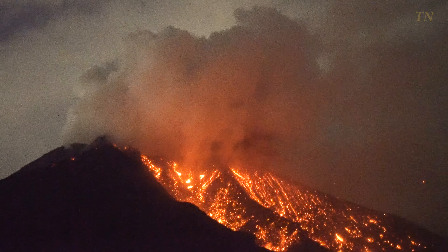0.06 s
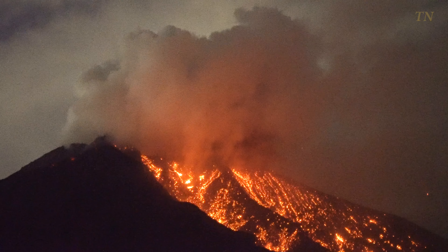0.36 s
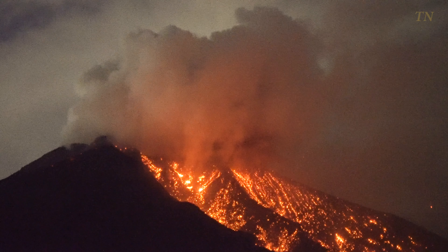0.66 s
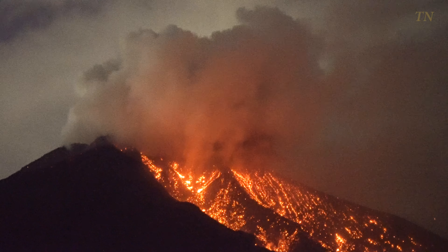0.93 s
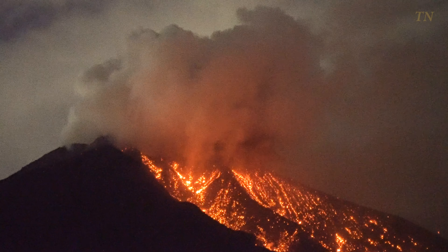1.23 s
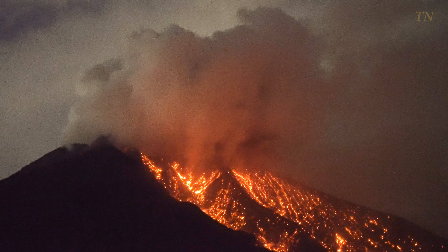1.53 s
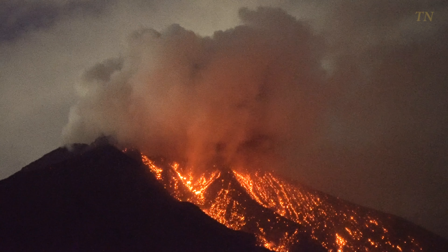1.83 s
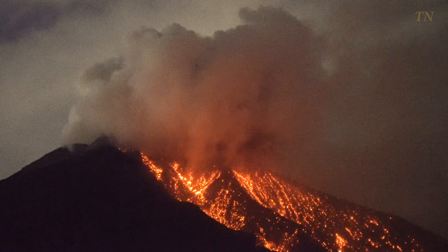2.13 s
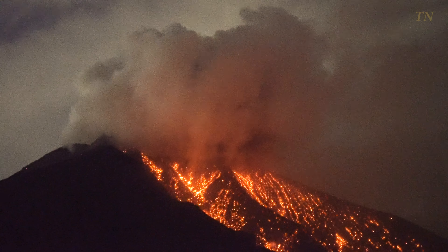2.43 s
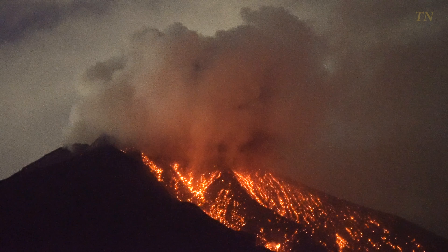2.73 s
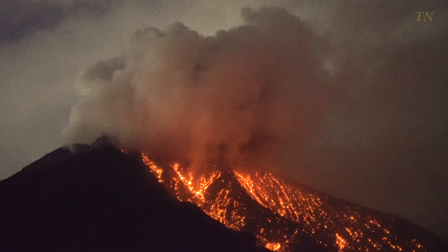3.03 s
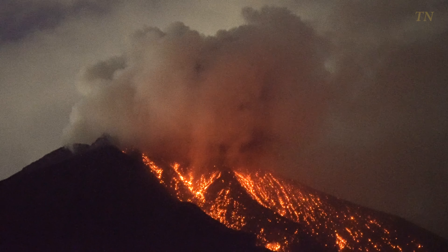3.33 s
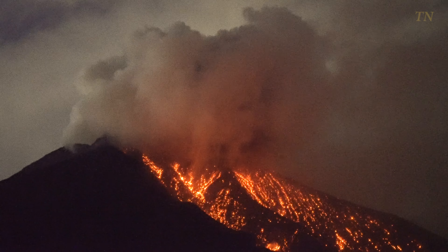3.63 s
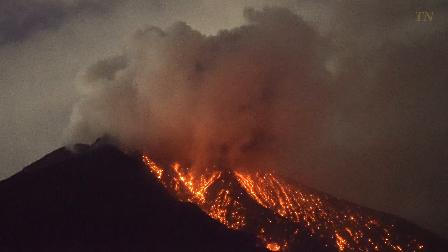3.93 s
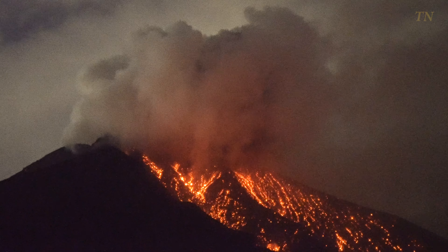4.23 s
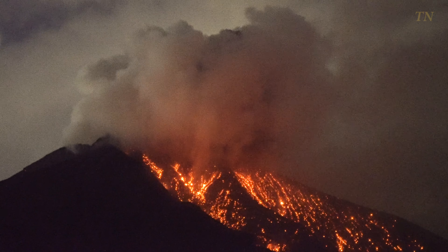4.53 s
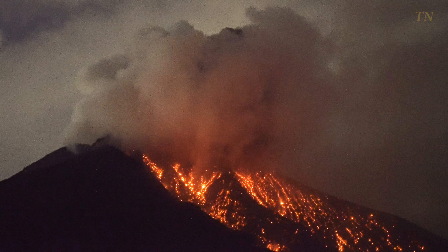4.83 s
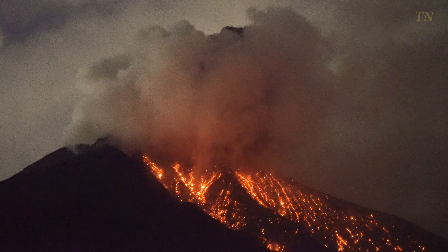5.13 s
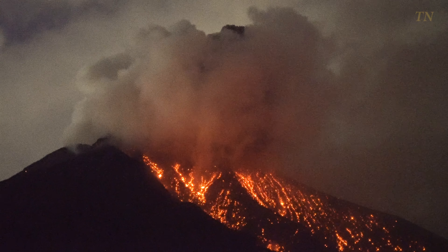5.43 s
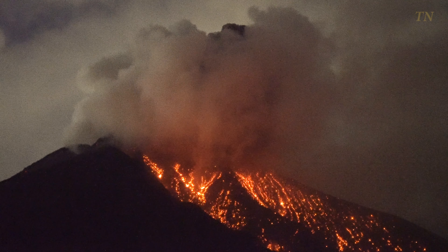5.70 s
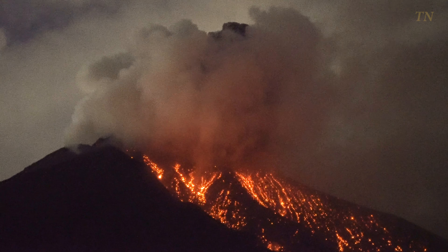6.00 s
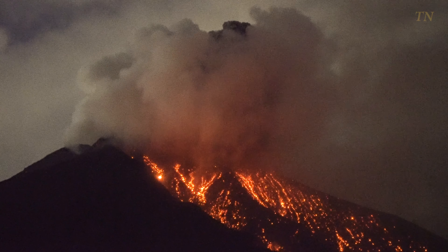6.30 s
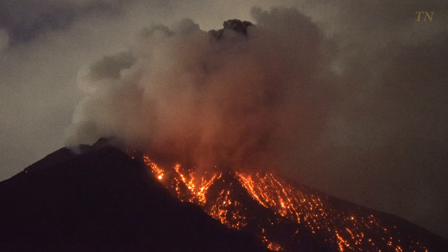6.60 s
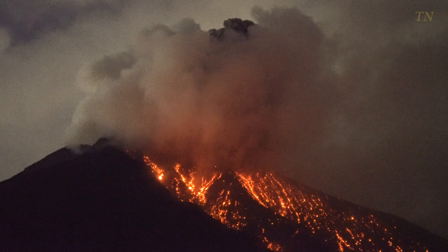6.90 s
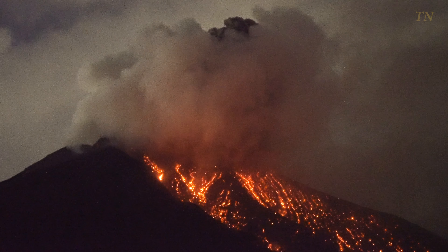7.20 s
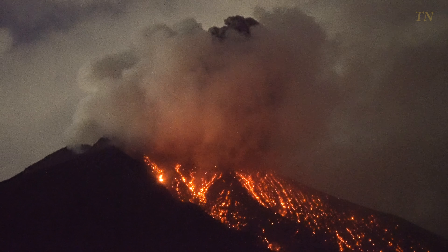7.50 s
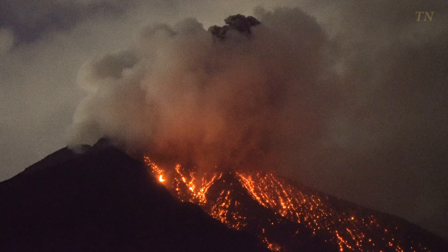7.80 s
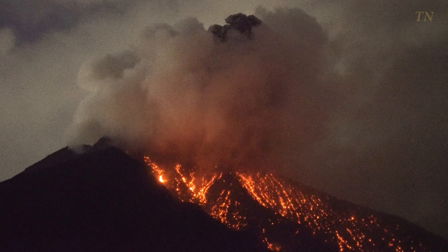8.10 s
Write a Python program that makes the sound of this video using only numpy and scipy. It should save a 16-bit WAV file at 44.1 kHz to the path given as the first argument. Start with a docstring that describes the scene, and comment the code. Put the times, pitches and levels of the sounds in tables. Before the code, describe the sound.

A volcano erupts a few kilometres away with a continuous deep, churning rumble. Rocks roll steadily down the slope, and heavy blocks land with irregular dull thuds and short cracks, followed by faint echoes. The impacts grow louder and more frequent after about two seconds, joined by a few very deep pulses of gas, then ease near the end. Distance muffles everything, and a faint electronic hiss lies behind it.

```python
"""A few kilometres from a volcano that is erupting at night.
Gas churns in the vent, making a rumble and a few very deep gulps. Blocks thud down and shatter
on the slope, with faint echoes, over a steady roll of tumbling rock.
The air has taken nearly all the treble, so above 2 kHz there is little but the hiss
and faint whine of the electronics."""
import sys
import numpy as np
from scipy import signal
from scipy.fft import rfft, irfft
from scipy.io import wavfile

SR = 44100
rng = np.random.default_rng(int(sys.argv[2]) if len(sys.argv) > 2 else 0)


def log_audio(samples):
    """Write samples as a 16-bit WAV file to the path given in sys.argv[1]."""
    # one column per channel
    frames = np.atleast_2d(samples).T
    # limit to full scale, then quantise
    limited = np.clip(frames, -1, 1)
    pcm = np.round(limited * 32767).astype(np.int16)
    wavfile.write(sys.argv[1], SR, pcm)


N = 359415
TIME = np.arange(N) / SR

# Levels in the tables are relative: the functions may add a gain of their own.
# how hard the vent is working: (time [s], rumble level [dB], deep surge level [dB])
VENT_LEVELS = [(0.0, -36, -47), (1.1, -33.5, -45), (1.8, -33.5, -31), (2.35, -34, -35), (2.65, -30.5, -29),
               (3.3, -31.5, -30), (3.85, -33.5, -32), (4.4, -31, -31), (5.45, -34, -30), (6.15, -32, -31),
               (6.4, -34, -43), (6.55, -32, -34), (6.87, -37, -32), (7.38, -30.5, -33), (7.65, -36.5, -39),
               (8.15, -38, -37)]
# tone of the churning gas: (frequency [Hz], level [dB])
RUMBLE_SPECTRUM = [(20, -21.5), (45, -1.5), (62, 0), (90, -2.5), (125, -0.5), (150, -3), (180, -13),
                   (260, -24), (600, -69.5)]
# tone of the heaving plume: (frequency [Hz], level [dB])
SURGE_SPECTRUM = [(5, -8.5), (18, -1), (30, -3.5), (50, -10), (80, -22), (300, -79)]
# deep gulps of gas: (time [s], level [dB])
GAS_GULPS = [(2.14, -15), (4.26, -19), (5.4, -21)]
# heavy blocks landing, and a few strong rebounds just after a landing (such as at 2.517, 4.539 and 5.336 s): #
# (time [s], level [dB], pitch [Hz])
LANDINGS = [ (.383, -21, 88), (.649, -22, 87), (.978, -20, 98), (1.342, -21, 105), (1.96, -19, 116),
            (2.253, -18.5, 115), (2.488, -6.5, 86), (2.517, -14, 145), (2.958, -11.5, 103),
            (3.394, -17, 63), (4.215, -15.5, 118), (4.513, -8.5, 108), (4.539, -17, 110),
            (4.868, -13.5, 141), (5.154, -18, 152), (5.302, -16.5, 89), (5.336, -13.5, 135),
            (5.412, -17.5, 121), (5.715, -7.5, 108), (5.797, -15, 98), (6.138, -15, 109),
            (6.537, -14.5, 81), (7.233, -8.5, 133), (7.495, -21, 96), (7.89, -19, 107)]
# blocks shattering; focus is the cut one octave away from the pitch:
# (time [s], level [dB], pitch [Hz], focus [dB], fade time [s])
BREAKUPS = [ (.604, -28, 320, 5, .005), (.931, -18.5, 760, 6, .005), (1.343, -18, 260, 3, .008),
            (2.037, -21, 290, 9, .008), (2.24, -29, 850, 8, .014), (2.437, -24.5, 700, 4, .007),
            (2.499, -17, 280, 1.4, .024), (2.689, -25.5, 630, 6, .009), (2.956, -20.5, 450, 2, .011),
            (3.135, -25, 815, 8, .026), (3.333, -26.5, 500, 2, .033), (3.679, -28.5, 900, 7, .013),
            (3.864, -24.5, 1000, 2.5, .017), (4.094, -25.5, 370, 5, .022), (4.287, -26.5, 430, 6, .02),
            (4.394, -22.5, 470, 3, .01), (4.727, -24, 320, 11, .007), (4.871, -27.5, 750, 4, .024),
            (5.02, -15.5, 360, 4.5, .014), (5.038, -20.5, 600, .3, .013), (5.285, -24, 650, 2, .008),
            (5.309, -17.5, 410, 3.5, .016), (5.411, -20, 550, .5, .015), (5.535, -23.5, 720, 6.5, .013),
            (5.76, -27, 900, 2, .008), (5.854, -21.5, 550, 2.5, .02), (6.139, -14, 230, 1.1, .011),
            (6.285, -24.5, 900, 0, .013), (6.309, -20, 580, 3, .017), (6.566, -26.5, 525, 2.5, .01),
            (6.768, -21.5, 2500, 1.2, .006), (6.8, -27, 430, 1, .006), (7.131, -25.5, 360, 7, .014),
            (7.259, -22, 560, 4, .007), (7.377, -27, 650, 0, .006), (7.407, -21, 520, 1, .019),
            (7.45, -22, 560, 5, .008), (7.546, -29, 2100, 3.2, .019), (7.78, -31, 700, 1.5, .013),
            (7.846, -27, 1100, 2, .02), (7.983, -28.5, 400, .5, .012)]
# how much rock is on the move: (time [s], level [dB])
SLIDE_LEVELS = [(0.0, -37), (1.05, -36.5), (1.5, -33), (2.6, -31), (3.1, -33), (3.6, -33.5), (4.38, -31.5),
                (4.75, -33.5), (5.3, -32.5), (5.6, -34), (6.0, -31.5), (6.45, -36.5), (6.67, -34),
                (6.85, -39.5), (7.25, -37.5), (7.45, -33.5), (7.83, -35.5), (8.15, -42)]
# tone of distant rock, with dips where the ground echo cancels the direct sound:
# (frequency [Hz], level [dB])
ROCK_SPECTRUM = [(40, -39.5), (185, -9.5), (215, -2.5), (280, -1.5), (345, 2), (440, -1), (510, -6),
                 (600, -8.8), (670, -4.8), (780, -6.6), (850, -12.3), (1150, -15), (1550, -21.8),
                 (1850, -30), (2500, -41), (5000, -71)]
# tone of the amplifier hiss: (frequency [Hz], level [dB])
HISS_SPECTRUM = [(100, -9), (2000, 1.5), (3500, -1), (6200, -2.5), (10000, -3), (15500, -4.5)]
# how alike the hiss is on the left and right: (frequency [Hz], likeness [0-1])
HISS_LIKENESS = [(1500, 1), (2800, 1), (4500, 0.95), (8000, .8), (15000, 0.77)]

THUD_HALF_S = .008  # half the length of a thud


def vent_rumble(churn_db=2., surge_db=1., puff_gain=.89):
    """Swirling gas in the vent: a churn with small puffs in it, over the slow heave of the plume."""
    gas = rng.standard_normal(N) + puff_gain * unit(clicks(N, per_s=70, spread_db=2.))
    churn = unit(colour(gas, RUMBLE_SPECTRUM, size=8192))
    heave = unit(colour(rng.standard_normal(N), SURGE_SPECTRUM, size=16384))
    churn *= amp(curve(VENT_LEVELS) + churn_db)
    heave *= amp(curve(VENT_LEVELS, column=2) + surge_db)
    return churn + heave


def gas_gulps(hz=25, half_s=.03):
    """Now and then the vent lets out one slow, very deep pulse."""
    out = np.zeros(N)
    for time, db in GAS_GULPS:
        offset, gulp = pulse(hz, half_s)
        add(out, time + offset, amp(db) * gulp)
    return out


def heavy_thuds(level_db=-.5, bounce_s=.026, bounce_db=-13, rubble_db=-12):
    """Each heavy block lands with a dull blow, kicks up rubble and bounces once, more softly."""
    out = np.zeros(N)
    for time, db, hz in LANDINGS:
        offset, blow = pulse(hz, THUD_HALF_S)
        add(out, time + offset, amp(db) * blow)
        offset, bounce = pulse(hz=140, half_s=THUD_HALF_S)
        add(out, time + bounce_s + offset, amp(db + bounce_db) * bounce)
        offset, rubble = shatter(hz=215, fade_s=.011, focus_db=2.2)
        add(out, time + offset, amp(db + rubble_db) * rubble)
    return amp(level_db) * out


def light_thuds(level_db=8.5, spread_db=2., low_hz=75, high_hz=150, count=24):
    """Small puffs of gas thud at random in the vent, louder when the vent is working harder."""
    out = np.zeros(N)
    for when, size, pitch in rng.random((count, 3)):
        offset, blow = pulse(low_hz + pitch * (high_hz - low_hz), THUD_HALF_S)
        db = level_db + spread_db * (2 * size - 1)
        add(out, when * N / SR + offset, amp(db) * blow)
    return amp(curve(VENT_LEVELS)) * out


def pulse(hz, half_s, rise=.95, steepness=2.3):
    """A few swings of air pressure that swell and fade. Returns (start before the peak [s], sound)."""
    t = np.arange(-4 * half_s, 4 * half_s, 1 / SR)
    width_s = np.where(t < 0, rise * half_s, half_s)
    swell = np.exp(-(abs(t) / width_s) ** steepness)
    return t[0], swell * np.sin(2 * np.pi * hz * t)


def crashes(early_s=.001):
    """Blocks burst on the slope, each at its own pitch."""
    out = np.zeros(N)
    for time, db, hz, focus_db, fade_s in BREAKUPS:
        offset, crash = shatter(hz, fade_s, focus_db)
        add(out, time + offset - early_s, amp(db) * crash)
    return out


def shatter(hz, fade_s, focus_db, rise=.55, blow_s=.002):
    """A hard blow in a shower of pieces: the longer a block crumbles, the weaker the blow."""
    t = np.arange(-SR // 10, SR // 5) / SR
    swell = np.exp(-abs(t) / np.where(t < 0, rise * fade_s, fade_s))
    shower = unit(swell * clicks(len(t), per_s=2500, spread_db=1.25))
    blow = blow_s / fade_s * unit(1. * (t == 0))
    sound = colour(shower + blow, ROCK_SPECTRUM, focus_db=focus_db, centre_hz=hz)
    return t[0], unit(sound) * np.sqrt(np.mean(swell ** 2))


def rock_slide(level_db=.5, wash=.98, spray=.55, spray_s=.014, tilt_db=3.1):
    """Countless stones roll downhill: single knocks and sprays of grit stand out of a blurred wash."""
    kicks = abs(clicks(N, per_s=38, spread_db=1.5))
    bursts = signal.lfilter([1], [1, -np.exp(-1 / (spray_s * SR))], kicks)  # each kick fades away
    grit = (wash + spray * unit(bursts)) * rng.standard_normal(N)
    stones = unit(clicks(N, per_s=500, spread_db=2.5)) + grit
    dull = unit(colour(stones, ROCK_SPECTRUM, -tilt_db))
    bright = unit(colour(stones, ROCK_SPECTRUM, tilt_db))
    brightness = np.clip(.5 + (-.8 + .12 * TIME) / (2 * tilt_db), 0, 1)  # starts dull, slowly brightens
    roll = unit((1 - brightness) * dull + brightness * bright)
    return amp(curve(SLIDE_LEVELS) + level_db) * roll


def slope_echoes(sound, echo_db=-11.5, tail_s=.65, delay_s=.015):
    """Ridges and gullies scatter the sound, adding a weak tail of echoes."""
    t = np.arange(SR) / SR
    echoes = clicks(SR, per_s=550, spread_db=-2.) * amp(-60 * t / tail_s) * (t > delay_s)
    echoes /= np.linalg.norm(echoes)
    return sound + amp(echo_db) * signal.oaconvolve(sound, echoes)[:N]


def electronics(hiss_db=-49., whine_db=-66., whine_hz=15734):
    """Amplifier hiss, a little different on each side, and the thin whine of a line-scan circuit."""
    hz = np.fft.rfftfreq(N, 1 / SR)
    likeness = np.clip(value_at(HISS_LIKENESS, hz), 0, 1)
    noise = rfft(rng.standard_normal((2, N))) * amp(value_at(HISS_SPECTRUM, hz))
    shared, opposite = noise * np.sqrt([1 + likeness, 1 - likeness])
    hiss = unit(irfft(np.array([shared + opposite, shared - opposite]), N))
    whine = np.sqrt(2) * np.sin(2 * np.pi * whine_hz * TIME)
    return amp(hiss_db) * hiss + amp(whine_db) * whine


def clicks(size, per_s, spread_db):
    """Random clicks: a few stand out as louder, or as softer if spread_db is negative."""
    chance, lot, sign = rng.random((3, size))
    height = amp(spread_db * np.minimum(-np.log(lot + 1e-9), 4))
    return (chance < per_s / SR) * height * np.sign(sign - .5)


def colour(sound, spectrum, tilt_db=0., focus_db=0., centre_hz=500, size=4096):
    """Gives a sound the tone of a spectrum, tilted (dB per octave) or focused around a centre pitch."""
    hz = np.fft.rfftfreq(size, 1 / SR)
    octaves = np.log2(np.clip(hz, 100, 2600) / centre_hz)
    hump_db = -np.minimum(focus_db * octaves ** 2, 25)
    log_gain = np.log(amp(value_at(spectrum, hz) + tilt_db * octaves + hump_db))
    mirrored = np.concatenate([log_gain, log_gain[-2:0:-1]])
    # this filter rings only after a click, so the click keeps its sharp start
    ring = np.fft.ifft(np.exp(signal.hilbert(mirrored).conj())).real
    return signal.oaconvolve(sound, ring[:size // 2])[:len(sound)]


def amp(db):
    """Turns decibels into a gain."""
    return 10 ** (np.asarray(db) / 20)


def unit(sound):
    """Scales a sound to an average strength (rms) of 1."""
    return sound / np.sqrt(np.mean(sound ** 2) + 1e-20)


def value_at(table, hz):
    """Looks up a table at any frequency, blending between rows on a pitch scale."""
    row_hz, values = np.transpose(table)
    return np.interp(np.log(hz + 1), np.log(row_hz + 1), values)


def curve(table, column=1):
    """One column of a time table, filled in for every sample."""
    rows = np.asarray(table)
    return np.interp(TIME, rows[:, 0], rows[:, column])


def add(mix, start_s, sound):
    """Mixes a sound in at a given time, dropping whatever does not fit."""
    start = round(start_s * SR)
    sound = sound[max(-start, 0):]
    part = mix[max(start, 0):][:len(sound)]
    part += sound[:len(part)]


def scene():
    """The mountain is so far away that left and right get the same sound."""
    mountain = vent_rumble() + gas_gulps() + rock_slide()
    mountain += slope_echoes(heavy_thuds() + light_thuds() + crashes())
    return np.array([mountain, mountain])


def record(dry):
    """The electronics add their own noise, then cut off the highest treble."""
    low_pass = signal.firwin(4095, cutoff=15760, window=("kaiser", 9), fs=SR)
    return signal.oaconvolve(dry + electronics(), low_pass[None], "same", axes=1)


dry = scene()
out = record(dry)
log_audio(out)
```